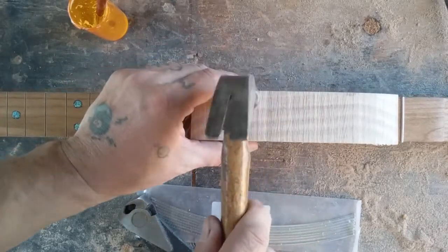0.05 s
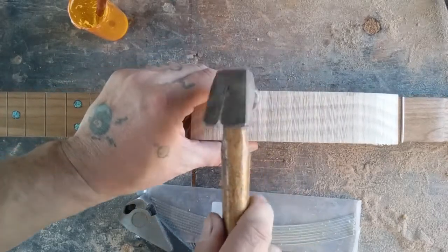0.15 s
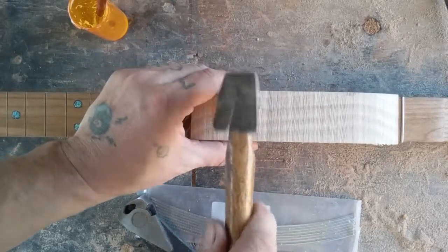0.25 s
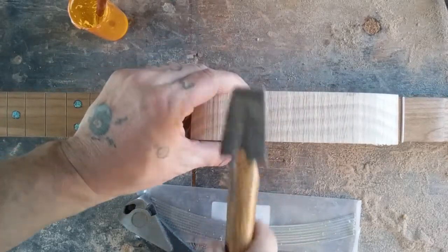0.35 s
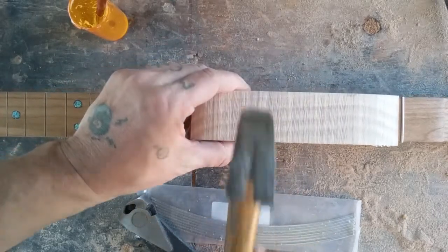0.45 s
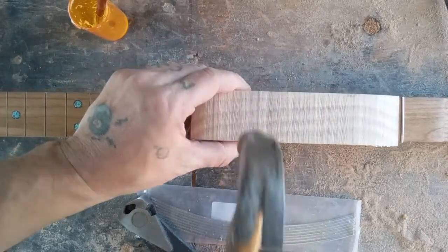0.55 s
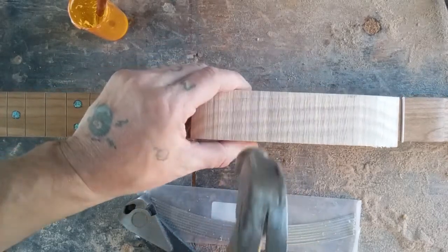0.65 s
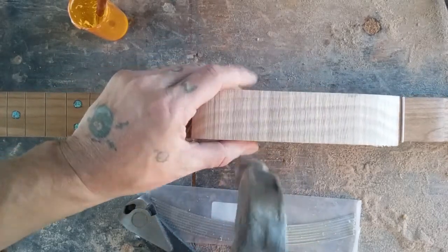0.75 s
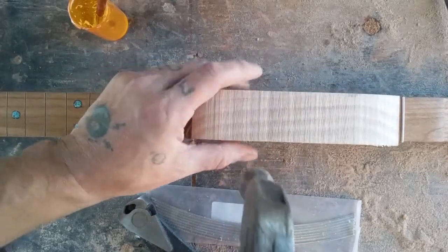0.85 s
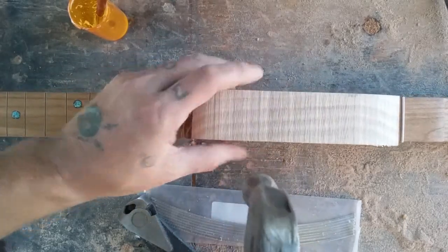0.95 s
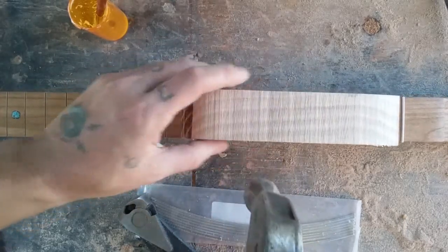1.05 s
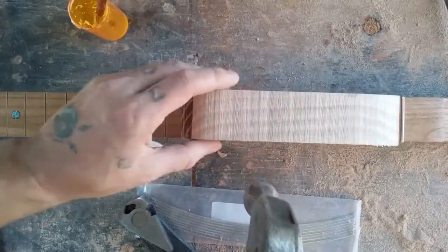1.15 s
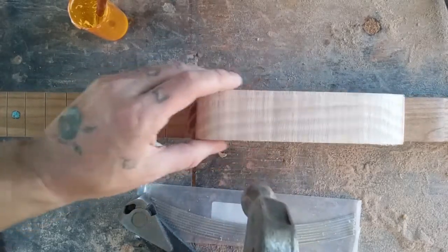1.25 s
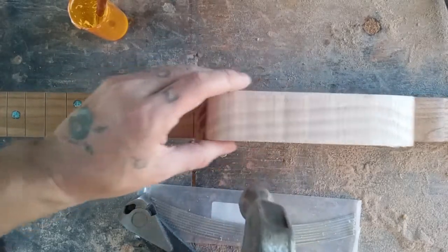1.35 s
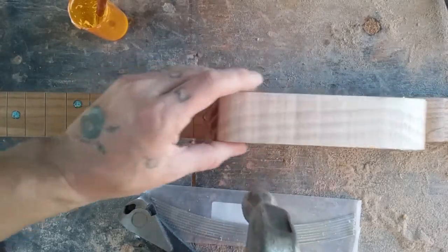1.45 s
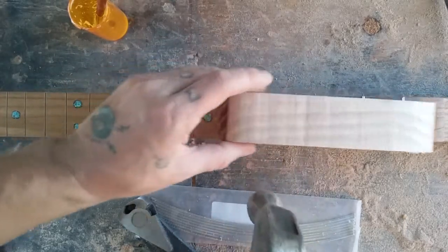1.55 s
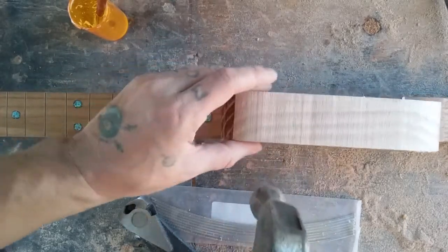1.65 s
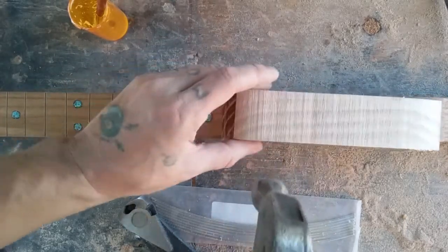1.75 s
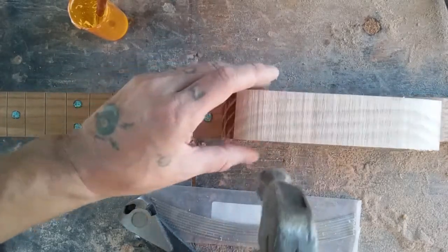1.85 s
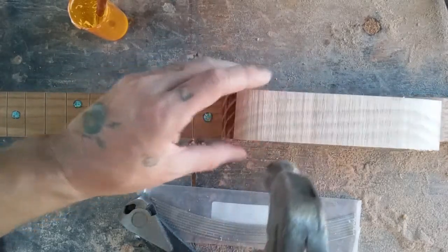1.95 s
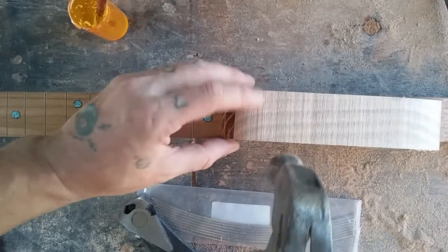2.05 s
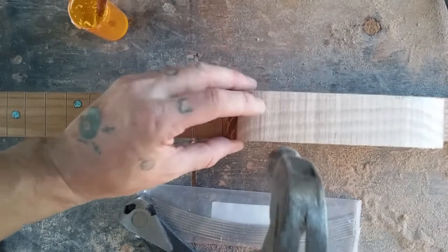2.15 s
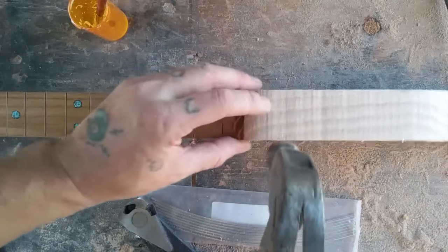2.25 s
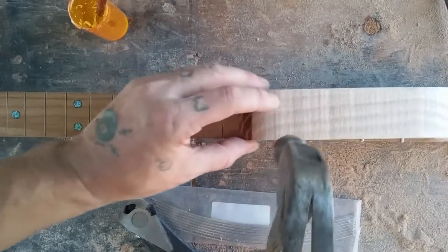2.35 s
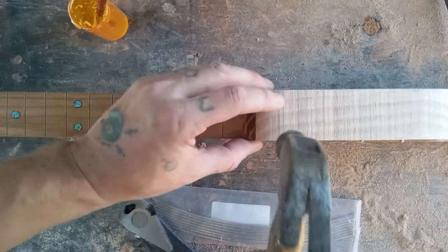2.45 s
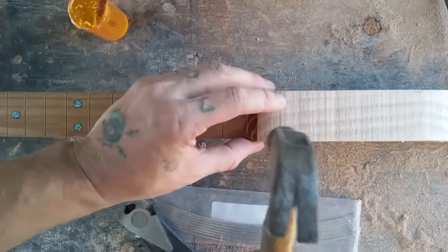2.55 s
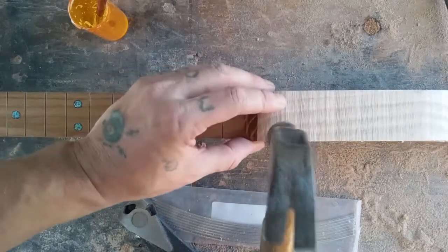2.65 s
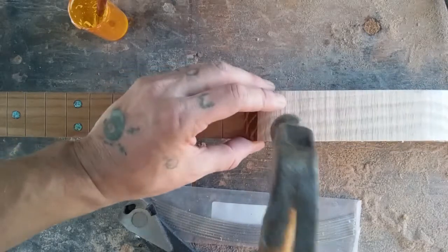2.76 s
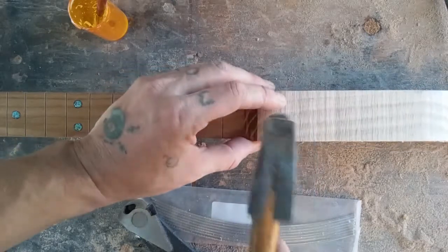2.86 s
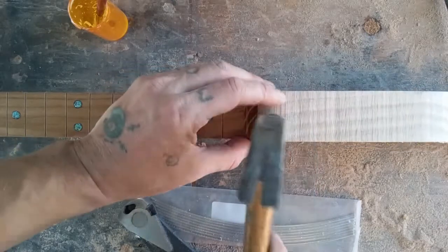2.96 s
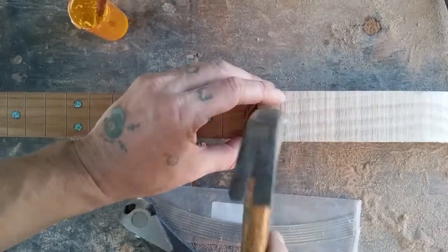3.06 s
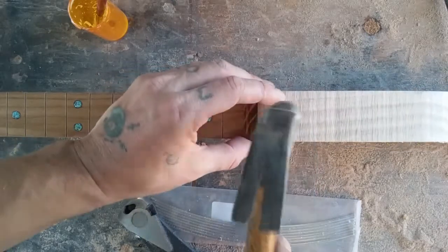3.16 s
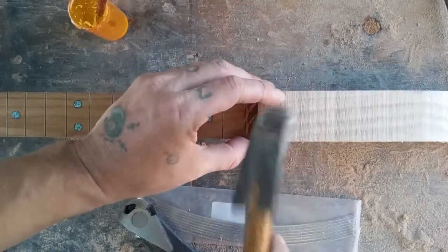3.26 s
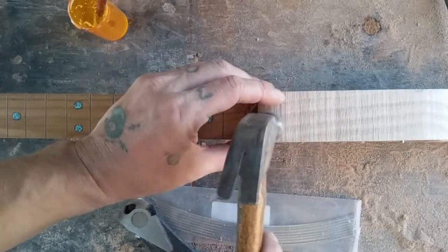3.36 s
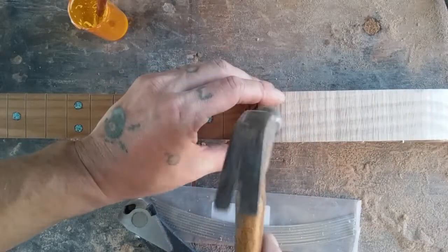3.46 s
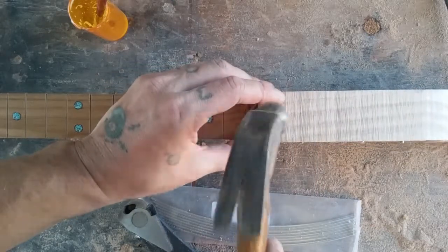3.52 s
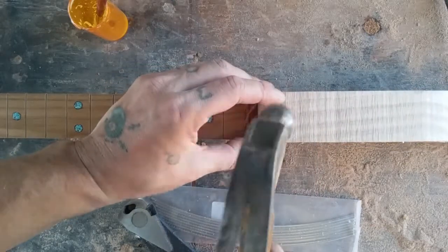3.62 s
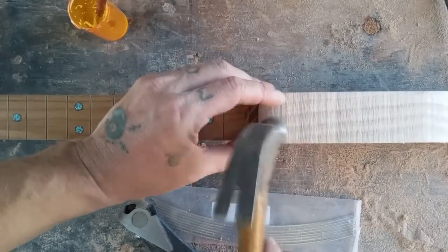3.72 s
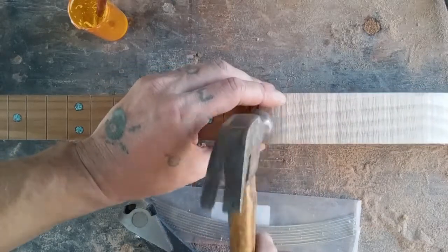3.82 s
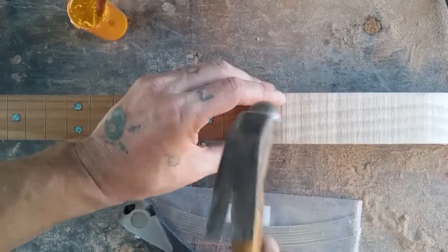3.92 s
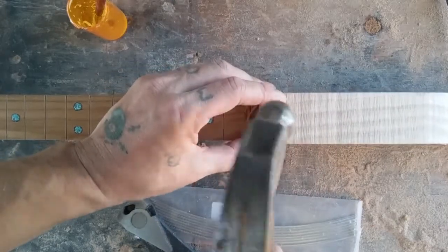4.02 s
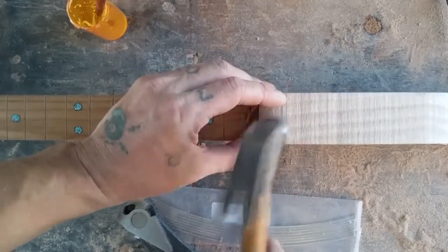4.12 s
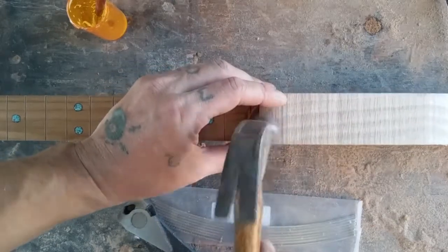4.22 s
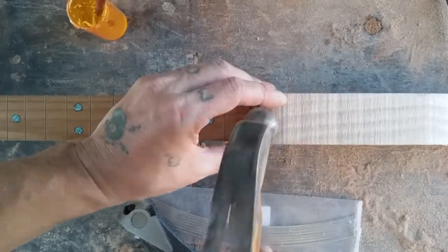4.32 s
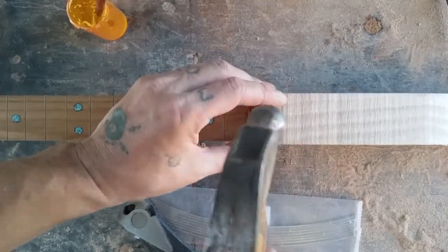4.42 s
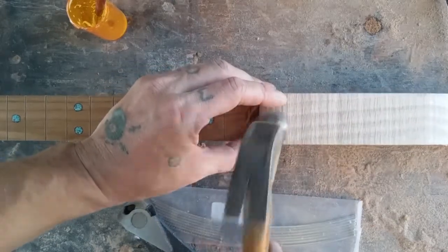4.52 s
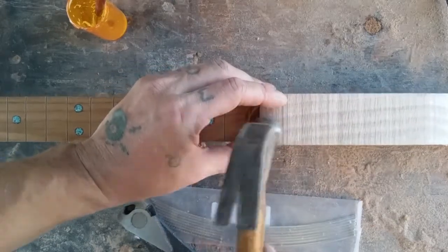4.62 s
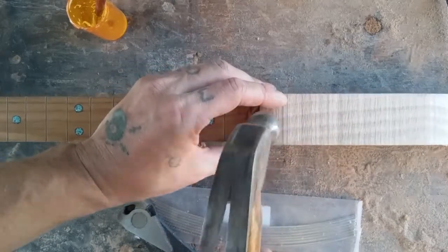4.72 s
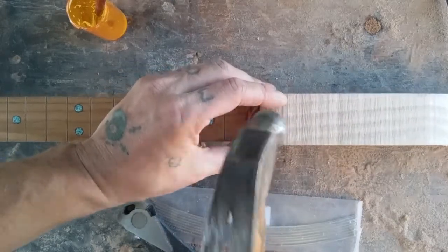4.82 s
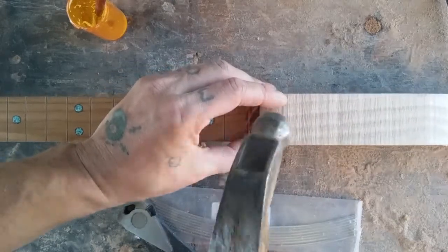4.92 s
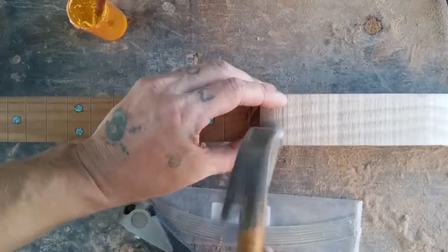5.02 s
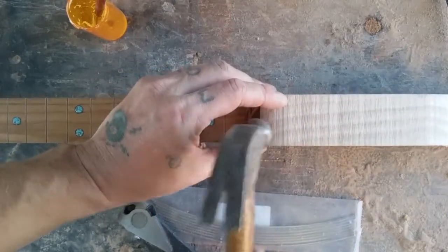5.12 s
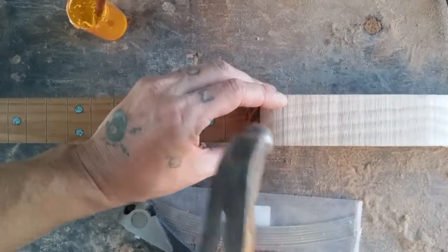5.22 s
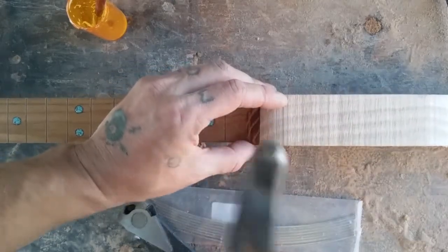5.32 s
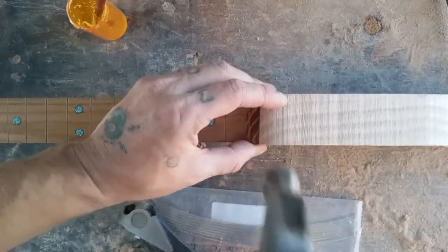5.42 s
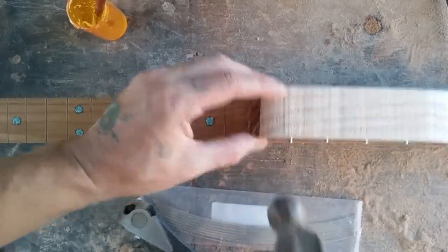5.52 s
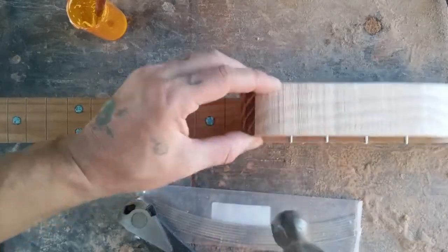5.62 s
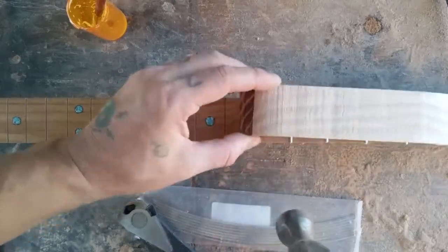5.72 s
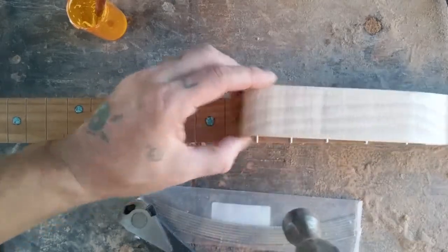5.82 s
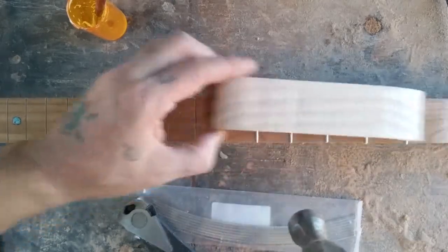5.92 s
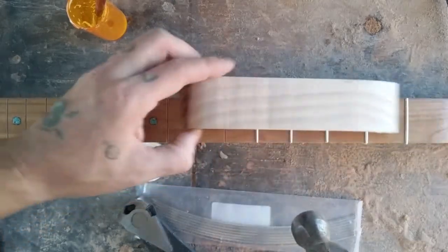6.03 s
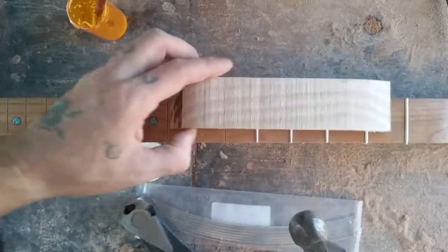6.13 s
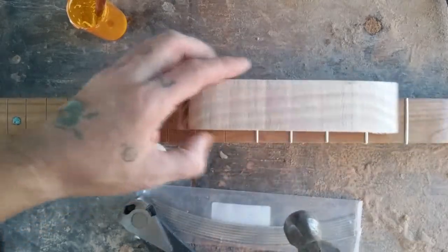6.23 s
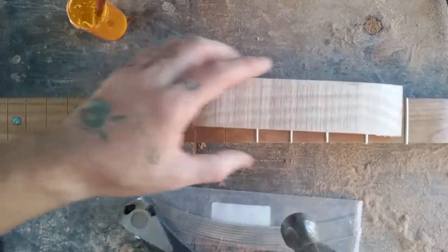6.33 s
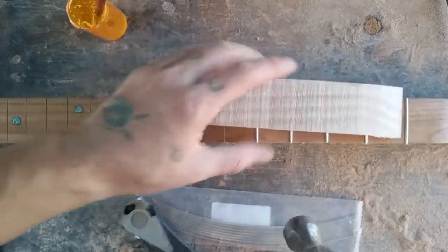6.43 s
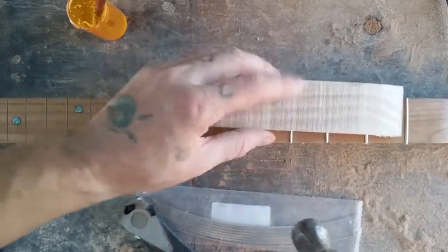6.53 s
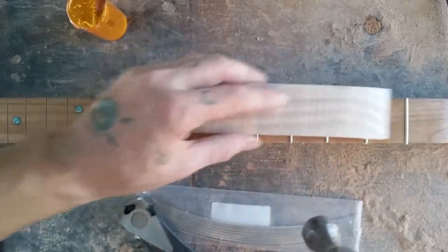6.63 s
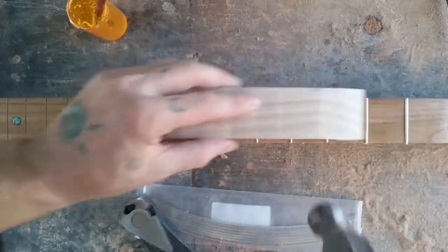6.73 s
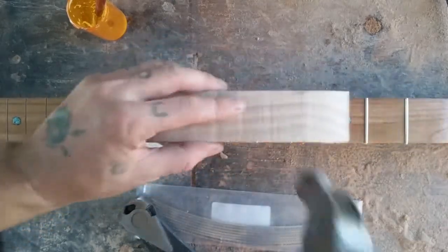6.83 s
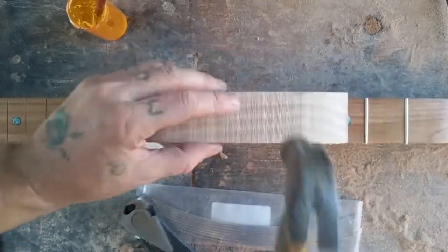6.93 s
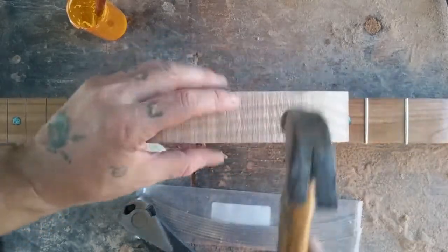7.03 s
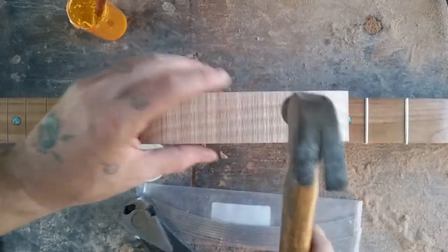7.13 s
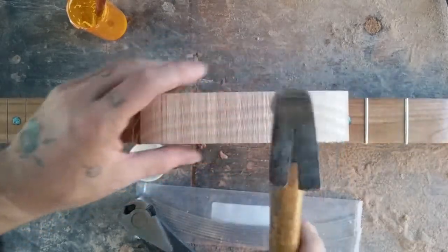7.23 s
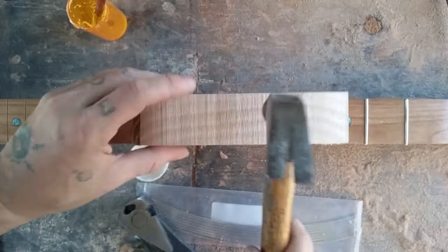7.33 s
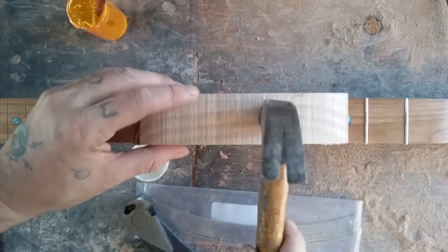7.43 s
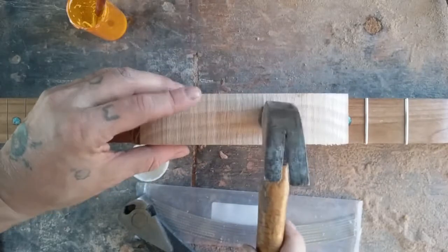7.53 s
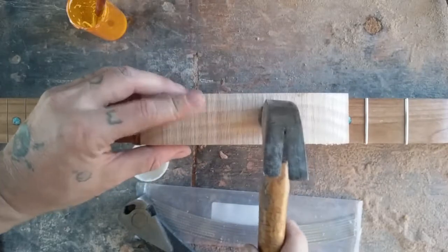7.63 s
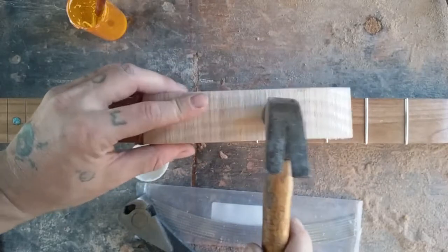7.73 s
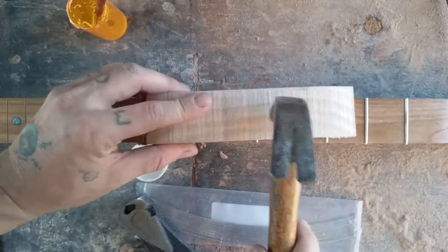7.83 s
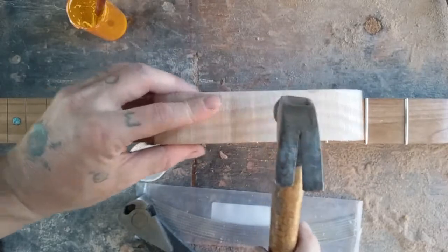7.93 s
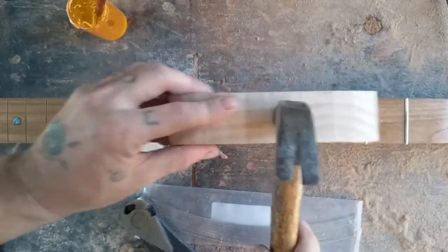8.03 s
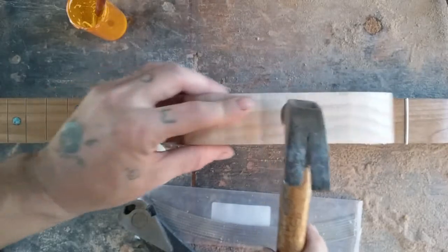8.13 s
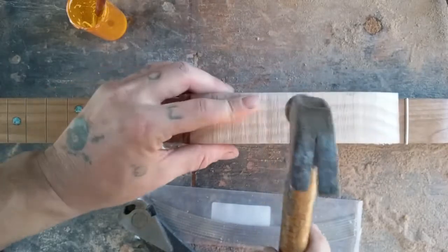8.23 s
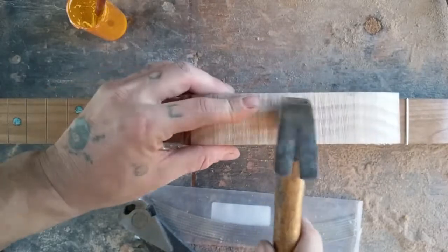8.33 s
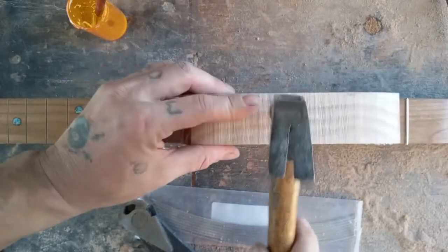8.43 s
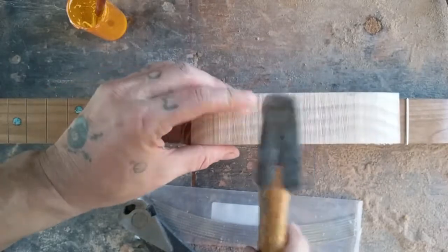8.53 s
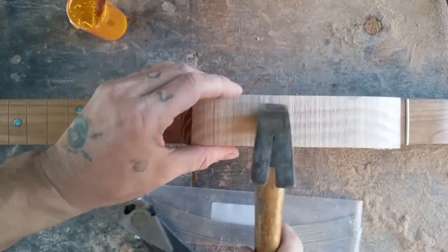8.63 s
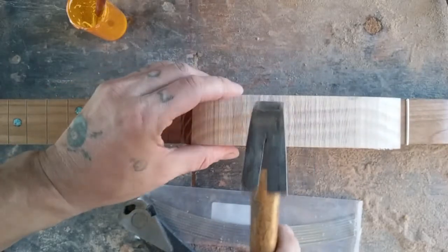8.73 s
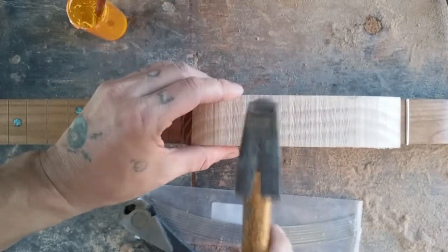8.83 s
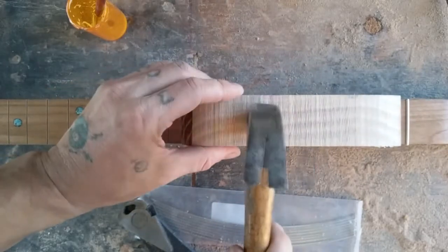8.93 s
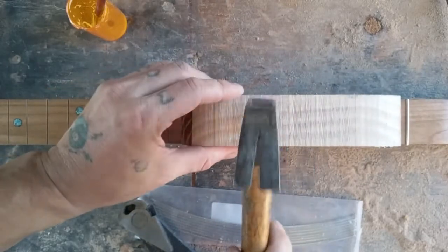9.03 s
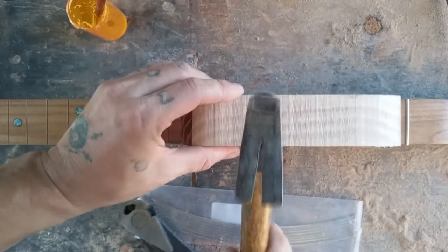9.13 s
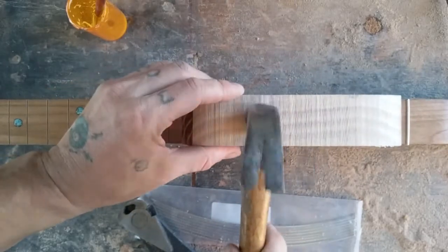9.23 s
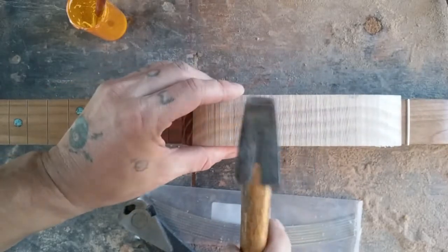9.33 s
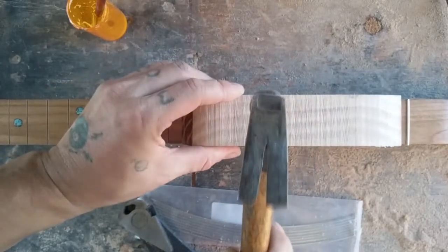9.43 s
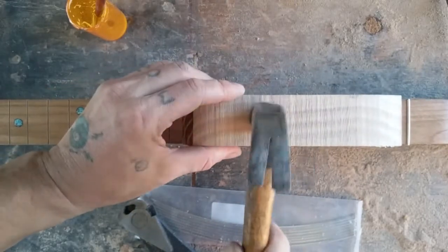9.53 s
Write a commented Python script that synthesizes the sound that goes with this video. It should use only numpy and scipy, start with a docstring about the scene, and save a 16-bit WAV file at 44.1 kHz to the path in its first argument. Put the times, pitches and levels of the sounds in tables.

```python
"""A steel hammer blow drives a wooden block that presses wire into a long board on a workbench; both rattle.
A hand then drags the block over the wire and sets it down: grains of friction and soft knocks ring the wood.
A run of blows and rebounds follows, with the steel ringing thinly, then more dragging and a last run
broken by a short drag. Throughout, a faint room tail answers and the close phone microphone hisses;
its gate opens with the sound, its limiter holds the peaks."""
import sys
import numpy as np
from scipy import signal
from scipy.fft import rfft, irfft, next_fast_len
from scipy.io import wavfile
from scipy.ndimage import uniform_filter1d, minimum_filter1d, map_coordinates

SR = 44100
rng = np.random.default_rng(int(sys.argv[2]) if len(sys.argv) > 2 else 0)


def unload_audio(sound):
    """Save the sound as a 16-bit wav file, at the path given as the first command line argument."""
    columns = np.transpose(np.atleast_2d(sound))
    # keep every value between -1 and 1, then stretch to whole-number steps
    steps = np.round(np.clip(columns, -1, 1) * 32767)
    wavfile.write(sys.argv[1], SR, steps.astype(np.int16))


N = 422037
SOUND_SAMPLES = 16384  # length of one knock or ring

# Hammer blows and rebounds: (time [s], strength [dB], hardness [dB], block ring [dB], rattle T60 [s])
BLOWS = [(0.1317, -8, 8.5, 1.5, 0.1), (0.1517, -21.5, 7, -1.5, .16), (3.0258, -13, 0.5, -1.5, .13),
         (3.0916, -19.5, -6.5, -3.5, 0.07), (3.3966, -5.5, 7, -10, .1), (3.4264, -9, -5, -1.5, 0.063),
         (3.4487, -15, 9.5, -3, 0.1), (3.8134, -6, 8, -4, 0.087), (3.8412, -12.5, 0, -2.5, .16),
         (3.8663, -18, 12.5, -7.5, .12), (4.24, -7, 8, -6, .14), (4.2739, -12, 2, -1, .047),
         (4.3051, -18, 1.5, -2, .042), (4.6656, -7, 8, -4, .12), (4.6945, -15, 2.5, 2.5, 0.093),
         (5.1173, -6.5, 5.5, -4.5, .13), (5.1476, -15.5, -1.5, -7.5, .12), (7.434, -34.5, -17, -4.5, .04),
         (7.4857, -11.5, -3, -0.5, .1), (7.5435, -19.5, -19, -10.5, 0.036), (8.093, -12, 4, 6, 0.096),
         (8.3856, -6, 1.5, -5.5, .15), (8.6629, -6, 1.5, 0.5, .1), (8.6979, -10, -13.5, -3.5, .041),
         (8.958, -6, 10.5, -0.5, .12), (8.9882, -13, -3.5, -8.5, .09), (9.2741, -8, 12.5, 3.5, .1),
         (9.3, -9.5, -5.5, -8.5, 0.047)]
# Part levels of a blow; rows: face, bench, board, block, hollow, click
# (offset over strength [dB], per strength [dB/dB], per hardness [dB/dB], per block ring [dB/dB])
BLOW_MIX = [(-1.5, 0, 1, 0.24), (-5, 0.01, .1, -.2), (0, 0, 0, 0), (0.5, 0, 0, 1), (-5.5, 0.03, .2, 0.59),
            (-22.5, -0.32, 2.5, 0.38)]
REBOUND_S, REBOUND_DB = .1, -18  # a contact this soon after another is a rebound: this much less click

# Free rings of the head off the wood: (time [s], level [dB], tilt [dB/octave], extra claw mode [dB])
STEEL_RINGS = [(.168, -33.5, 2, -2), (3.435, -39, 6.5, 13), (3.91, -47.5, -1.5, 11), (4.3, -54, -21.5, 12),
               (4.704, -30, -1, 1), (5.158, -36, 3.5, 0.5), (7.493, -48.5, 6.5, 4), (8.112, -43.5, 0, 5.5),
               (8.411, -47, 9.5, 3), (8.682, -46, 5.5, 7), (9.011, -47, 7, -0.5), (9.31, -43, 9.5, -8)]
# Modes of the hammer head: (frequency [Hz], level [dB], T60 [s])
STEEL_MODES = [(2323, -7, .19), (2982, -14, .14), (3268, -14, .3), (3677, -14, .12), (4240, -5, .21),
               (4850, -19, .2), (5206, -14, .2), (5432, -14, .15), (5795, -6, .14), (6420, -3, .1),
               (7960, -3, .1), (8220, -15, .12), (8930, -2, .085), (9617, -14, .1), (10385, -7, .085),
               (11900, -10, .07), (13570, -12, .08), (15300, -10, .07)]
CLAW_HZ = 4240  # the claw's mode; the tilt turns about it
BUZZ_DB, BUZZ_HZ, BUZZ_T60_S = -1, 500, 0.091  # random flutter at the start of a ring

# Block bumps a wire or is set down: (time [s], strength [dB], hardness [dB], block ring [dB])
BUMPS = [(0.2786, -45, -19, -4), (0.5155, -36.5, -25, -7), (0.6094, -55, -21, -21),
         (0.7772, -39, -24, -15.5), (.79, -39, -32.5, -30), (1.3271, -26.5, -27, -25),
         (1.4722, -38.5, -5, 6), (1.5085, -34.5, -26, 8.5), (1.5651, -23, -16.5, -17),
         (2.2565, -54, -19.5, -20), (2.3006, -35.5, -29, -19), (2.4153, -27, -32.5, -7.5),
         (2.4703, -30.5, -30, -1), (5.5466, -35.5, -29, -18), (5.5727, -31, -38, -13.5),
         (5.6457, -43, -12.5, -17), (5.7466, -45, -20, -20), (5.849, -34, -32, -23.5),
         (6.0071, -29.5, -9, -11), (6.0273, -22.5, -17.5, -15), (6.0653, -17, -14.5, -8),
         (6.1261, -24.5, -23, -30.5), (6.2451, -21.5, -13, -7), (6.257, -20.5, -8, -12),
         (6.5912, -33, -28, -14), (6.658, -32, -27, -23.5), (6.7127, -18.5, -5.5, -12),
         (6.7528, -16.5, -11, -11), (6.793, -26, -11, 0), (6.9992, -49, -17.5, -31),
         (7.0391, -36.5, -28, -41), (7.0814, -56, -9.5, -13.5), (7.1582, -40.5, -24.5, -39),
         (7.29, -55, -11, -17), (7.951, -47.5, -19, -19), (7.9969, -35, -7, -6.5),
         (8.0069, -22, -22.5, -21), (8.0385, -20, -16.5, -19.5), (8.076, -16.5, -13.5, -9.5),
         (8.2735, -33, -28, -22)]
# Part levels of a bump; rows and columns as BLOW_MIX
# (offset over strength [dB], per strength [dB/dB], per hardness [dB/dB], per block ring [dB/dB])
BUMP_MIX = [(-0.5, -0.18, 1, 0.011), (-16.5, -0.41, 0.08, 0.099), (1.5, 0.15, 0.02, 0), (0.5, 0.12, 0, 1),
            (-6.5, 0.014, 0.96, .3), (-30, 0.9, 0.98, 0.01)]
BUMP_RATTLE_T60_S = .042

# Drag envelopes, one list per stroke: (time [s], board level [dB], brightness [dB])
DRAGS = [
    [(1.31, -65.5, -21), (1.332, -32.5, -12), (1.35, -33, -24), (1.49, -28.5, -16), (1.556, -27.5, -9),
     (1.57, -22, -20.5), (1.59, -34, -10.5), (1.626, -31.5, -15), (1.796, -44.5, -26.5), (1.86, -87.5, 0)],
    [(2.24, -45, -25.5), (2.268, -35.5, -37), (2.282, -52, -21), (2.304, -28.5, -24), (2.318, -38, -21),
     (2.382, -37, -18), (2.408, -31.5, -25), (2.418, -33.5, -11.5), (2.52, -30, -27), (2.58, -78, -9.5)],
    [(5.54, -66, -13), (5.55, -42.5, -25), (5.57, -50, -24), (5.578, -40, -16), (5.59, -40.5, -30),
     (5.624, -60.5, -14), (5.652, -45, -16.5), (5.696, -65, -8), (5.758, -42, -20), (5.82, -83, -24)],
    [(5.84, -60.5, -12), (5.852, -41.5, -22.5), (5.992, -51.5, -3), (6.008, -34.5, -2.5),
     (6.038, -27, -4.5), (6.056, -34.5, -7.5), (6.072, -21.5, -13), (6.11, -44, -8), (6.128, -26, -15),
     (6.22, -70, -26)],
    [(6.23, -45.5, -15), (6.246, -27, -10), (6.264, -26.5, -5), (6.278, -32.5, -4), (6.324, -26, -27),
     (6.34, -26.5, -19), (6.366, -30.5, -32.5), (6.452, -74.5, -11), (6.474, -56.5, -22), (6.5, -69, -13)],
    [(6.55, -63, -23), (6.6, -36, -24.5), (6.63, -61, -11.5), (6.674, -29, -18.5), (6.754, -22.5, -6),
     (6.762, -13.5, -17), (6.894, -28, -18), (6.942, -37, -29), (6.972, -63.5, -12), (7.0, -68, -11)],
    [(7.92, -64.5, -16), (7.954, -43, -26.5), (7.99, -41.5, -17), (7.996, -37.5, -10.5),
     (8.014, -28.5, -12.5), (8.022, -33, -2), (8.03, -32.5, -13.5), (8.054, -27, -5.5), (8.085, -27.5, -6)],
    [(8.125, -12.5, -10.5), (8.133, -25.5, -14.5), (8.193, -28.5, -6.5), (8.221, -29, -17),
     (8.231, -36, -12.5), (8.265, -38, -19), (8.277, -34.5, -17), (8.287, -32, -30.5), (8.341, -68, -11),
     (8.36, -61, -16)],
]
# Per stroke: (wire squeak [dB], weight on the bench [dB])
STROKES = [(-7, 3), (-14, -0.5), (5, -6), (4.5, -2), (-1, 2.5), (1.5, 3), (-7, 0.5), (-2, 3.5)]
# Part levels of rubbing; rows: board, bench, block, hollow, squeak, scratch
# (offset over board [dB], per board level [dB/dB], per brightness [dB/dB])
DRAG_MIX = [(0, 0, 0), (-17, -0.22, 0.028), (-3, 0.2, 0.71), (-8.5, 0.1, 0.9), (-27, -0.43, 1.1),
            (-6.5, 0.43, 0.85)]
CATCH_HZ, CATCH_DB = 90, 2  # rate of random points, level swing per standard deviation
SLIPS_PER_S, SLIP_S, SLIP_DB = 150, .003, -3  # sudden slips of the sliding block

# Resonances of bench, board, block and the face struck: (centre [Hz], width [Hz], level [dB])
BENCH = [(62, 20, -10), (80, 13, -6), (97, 12, -2), (130, 18, 0), (177, 18, 0), (215, 30, -8)]
BOARD = [(269, 20, -13), (336.3, 29, -4), (414, 75, -12), (513.1, 40, -9), (629, 180, -17), (797, 75, -13)]
BLOCK = [(1009, 88, 0), (1262, 220, 2), (1525, 320, -6)]
FACE = [(2426, 300, -6), (2860, 530, -2), (3254, 310, -1), (3340, 400, -3.5), (4056, 210, 1.5),
        (4350, 120, -4.5), (4315, 550, -5.5)]
# Contact click, hollow under the block, wire squeak, scratch: (centre [Hz], width [Hz], level [dB])
CLICK = [(6030, 300, -0.5), (8380, 1100, -3), (11700, 1600, -2.5), (13230, 1600, -4), (14264, 1700, -7)]
HOLLOW = [(1740, 210, -3), (1884, 160, -2.5), (2172, 140, -8)]
SQUEAK = [(2635, 57, -9.5), (2886, 230, -8.5), (6480, 52, -17)]
SCRATCH = [(2640, 820, 2.5), (3700, 830, 2), (4700, 270, -6), (5870, 840, -17)]
WOOD_TOP_HZ = 8600  # wood passes little above this
BRIDGE_START_S, BRIDGE_END_S, BRIDGE_DB = 7.2, 8.14, 7.5  # block bridges unseated wires: louder hollow
MOVED_S, MOVED_DB = 7.2, -4  # from here the block lies further along the board: knocks stir the bench less

# Decay of the room tail: (frequency [Hz], T60 [s])
SHOP_DECAY = [(80, 0.88), (400, 0.19), (2000, 0.13), (10000, 0.054)]
# Hiss spectrum before levelling: (frequency [Hz], relative density [dB/Hz])
HISS_SPECTRUM = [(15, -44.5), (33, -20.5), (60, -9), (114, -11), (266, -14.5), (400, -12.5), (2600, -25.5),
                 (3910, -29.5), (8000, -27), (14000, -22.5), (16500, -30.5)]
HISS_DB = -62.5  # RMS ahead of the microphone chain
# Left-right difference: (frequency [Hz], level of the added quadrature signal [dB])
WIDTH = [(60, -42), (350, -55.5), (1400, -36), (3000, -28.5), (11000, -34.5)]
TOP_HZ = 16200


def hammer():
    """Blow forces ring wood and hollow; the head, sprung free, rings in its own modes."""
    return hammer_on_wood() + steel_ring()


def hammer_on_wood():
    """Hard, brief contacts excite the block, board and bench; rebounds click less."""
    hit_s, *controls_db, rattle_t60_s = np.transpose(BLOWS)
    parts_db = mixed(BLOW_MIX, *controls_db)
    rebound = np.diff(hit_s) < REBOUND_S
    parts_db[-1, 1:] += REBOUND_DB * rebound
    return knocks(hit_s, parts_db, rattle_t60_s, FACE, rattle_db=[-25.5, -10.5, -7.0, -18.5, -13.0, -33.5],
                  contact_s=0.00033, crack_s=0.00066, click_s=.0008)


def steel_ring():
    """Decaying sine modes of the free head; the ring starts rough, then settles."""
    ring_s, ring_db, tilt_db, claw_db = np.transpose(STEEL_RINGS)
    hz, mode_db, t60_s = np.transpose(STEEL_MODES)[:, :, None]
    t = np.arange(SOUND_SAMPLES) / SR
    onset = 1 - np.exp(-t / .002)
    modes = amp(mode_db - 60 * t / t60_s) * np.sin(2 * np.pi * hz * t) * onset
    scatter_db = 3 * rng.standard_normal((len(ring_s), len(hz)))
    colour_db = ring_db + tilt_db * np.log2(hz / CLAW_HZ) + claw_db * (hz == CLAW_HZ)
    strength = amp(scatter_db + colour_db.T)
    noise = rng.standard_normal((len(ring_s), SOUND_SAMPLES))
    flutter = unit(filtered(noise, lambda f: 1 / (1 + 1j * f / BUZZ_HZ)))
    roughness = 1 + amp(BUZZ_DB - 60 * t / BUZZ_T60_S) * flutter
    return placed(ring_s, strength @ modes * roughness)


def knocks(s, parts_db, rattle_t60_s, face, rattle_db, contact_s, crack_s, click_s):
    """Each contact is a short rough push, then loose parts chatter; every part of the wood rings with it."""
    t = np.arange(SOUND_SAMPLES) / SR
    parts_db[4] += bridged_db(s)
    parts_db[1] += MOVED_DB * (s > MOVED_S)
    noise = rng.standard_normal((len(s), SOUND_SAMPLES))
    push = (1 + 0.93 * noise) * np.exp(-t / contact_s)

    def crush(rise_s):
        """Fibres and grit give way as the faces meet."""
        return noise * t / rise_s * np.exp(-t / rise_s)

    softness = amp(-.25 * (parts_db[0] - parts_db[0].max()))[:, None]  # a weaker contact lasts longer
    crack = crush(crack_s * np.minimum(softness, 2.5))
    spikes = noise * amp(7.97 * rng.standard_normal(noise.shape))
    t60_s = np.clip(rattle_t60_s, .005, .4)[..., None]
    chatter = spikes * amp(-60 * (t / t60_s) ** 1.136)  # dies ever faster
    parts = [face, BENCH, BOARD, BLOCK, HOLLOW, CLICK]
    forces = [crack, push, push, push, push, crush(click_s)]
    sound = 0
    for part, force, part_db, loose_db in zip(parts, forces, parts_db, rattle_db):
        ring = rung(force + amp(loose_db) * chatter, part, scatter_db=2)
        if part is not CLICK:
            ring = filtered(ring, lambda hz: 1 / (1 + 1j * hz / WOOD_TOP_HZ) ** 2)
        peak = np.abs(ring).max(axis=1, keepdims=True)
        sound = sound + amp(part_db)[:, None] * ring / peak
    return placed(s, sound)


def bumps():
    """Soft wood-on-wire contacts excite the same wood, with scratch in place of the struck face."""
    s, *controls_db = np.transpose(BUMPS)
    return knocks(s, mixed(BUMP_MIX, *controls_db), BUMP_RATTLE_T60_S, SCRATCH,
                  rattle_db=[-15, -5.5, -17.5, -7.5, -9, -6.5],
                  contact_s=0.00009, crack_s=0.0008, click_s=.001)


def drag():
    """Uneven grains of friction shake the wood and the wire while the block slides."""
    t = np.arange(N) / SR
    parts = [BOARD, BENCH, BLOCK, HOLLOW, SQUEAK, SCRATCH]
    sharpness = [1.2, 1.3, 3, 3, 1.4, 0.062]
    grains = friction()
    ringing = []
    for part, again in zip(parts, sharpness):
        # steady rubbing feeds the strongest resonances most
        fed_back = again * unit(rung(grains, part))
        ringing.append(unit(rung(grains + fed_back, part)))
    catch = map_coordinates(rng.standard_normal(N * CATCH_HZ // SR + 4), [t * CATCH_HZ])  # catches and slips
    return amp(CATCH_DB * catch) * np.sum(drag_levels(t) * np.array(ringing), axis=0)


def friction():
    """Spiky noise grains swell at random slips, each swell decaying exponentially."""
    grains = rng.standard_normal(N) * amp(5.6 * rng.standard_normal(N))
    slips = (rng.random(N) < SLIPS_PER_S / SR) * rng.exponential(size=N)
    swell = filtered(slips, lambda hz: SR * SLIP_S / (1 + 2j * np.pi * hz * SLIP_S))
    return grains * (1 + amp(SLIP_DB) * np.abs(swell))


def drag_levels(t):
    """Gain of each part over time; the holding hand stops the ringing with the stroke."""
    levels = np.zeros((len(DRAG_MIX), N))
    for stroke, (squeak_db, bench_db) in zip(DRAGS, STROKES):
        s, *controls_db = np.transpose(stroke)
        parts_db = mixed(DRAG_MIX, *controls_db)
        parts_db[1] += bench_db
        parts_db[3] += bridged_db(s)
        parts_db[4] += squeak_db
        fade = np.clip(np.minimum(t - s[0], s[-1] - t) / 0.0065 + .5, 0, 1)
        levels += fade * amp([np.interp(t, s, db) for db in parts_db])
    return levels


def shop(x):
    """Room tail of noise in which each frequency dies at its own speed."""
    hz, t, z = signal.stft(rng.standard_normal(SR // 2), SR, nperseg=256)
    decay = amp(-60 * t / along(SHOP_DECAY, hz)[:, None])
    tail = signal.istft(z * decay, SR, nperseg=256)[1]
    delayed = np.pad(x, (300, 0))  # samples
    return signal.fftconvolve(delayed, tail / np.linalg.norm(tail))[:N]


def microphone_hiss():
    """Steady noise shaped to the hiss spectrum."""
    noise = rng.standard_normal(N)
    return amp(HISS_DB) * unit(filtered(noise, lambda hz: amp(along(HISS_SPECTRUM, hz))))


def mixed(mix, level_db, *colours_db):
    """Level of every part from one level and its colour controls."""
    return level_db + np.array(mix) @ [np.ones_like(level_db), level_db, *colours_db]


def bridged_db(s):
    """Extra level of the hollow at each time."""
    return BRIDGE_DB * ((s > BRIDGE_START_S) & (s < BRIDGE_END_S))


def rung(force, modes, scatter_db=0):
    """Force through parallel resonances of alternating sign; each row strikes them at scattered strengths."""
    spot = amp(scatter_db * rng.standard_normal((len(modes), *force.shape[:-1], 1)))

    def response(f):
        """Sum of band-pass resonances."""
        total = 0
        for k, (centre, width, db) in enumerate(modes):
            resonance = 1j * f * width / (centre * centre - f * f + 1j * f * width)
            total = total + (-1) ** k * amp(db) * spot[k] * resonance
        return total

    return filtered(force, response)


def placed(times_s, sounds):
    """Short sounds laid out at their times."""
    out = np.zeros(N + SOUND_SAMPLES)
    for s, sound in zip(times_s, sounds):
        out[round(s * SR):][:SOUND_SAMPLES] += sound
    return out[:N]


def filtered(x, response):
    """x times a complex response of frequency."""
    n = x.shape[-1]
    m = next_fast_len(n + SOUND_SAMPLES)
    return irfft(rfft(x, m) * response(np.fft.rfftfreq(m, 1 / SR)), m)[..., :n]


def along(points, hz):
    """Interpolates (frequency [Hz], value) points on a log axis."""
    f, v = np.transpose(points)
    return np.interp(np.log(hz + 1), np.log(f + 1), v)


def amp(db):
    """dB to amplitude."""
    return 10 ** (np.asarray(db) / 20)


def unit(x):
    """Scales to unit RMS."""
    return x / np.sqrt(np.mean(x ** 2) + 1e-20)


def scene():
    """Sums hammer, handling, room and hiss; the channels differ by a slight phase."""
    blows = hammer()
    handling = bumps() + drag()
    room = amp(-21) * shop(blows + amp(-11.5) * handling)
    heard = blows + handling + room
    side = filtered(heard, lambda hz: 1j * amp(along(WIDTH, hz)))
    return heard + microphone_hiss() + np.array([side, -side])


def record(dry):
    """The capsule loses deep bass, a gate turns quiet moments down, a limiter holds peaks, the band ends."""
    dry = filtered(dry, lambda hz: (1j * hz / (1j * hz + 45)) ** 2)
    upper = filtered(dry, lambda hz: 1 / (1 + (220 / (hz + 1)) ** 4))  # the gate neither hears nor cuts the bass
    span = int(0.025 * SR)
    power = uniform_filter1d(upper[0] ** 2, span, origin=span // 3)  # left channel, mostly the past
    level_db = 10 * np.log10(np.abs(power) + 1e-12)
    gate_db = np.clip(0.81 * (level_db + 50.5), -11, 0)
    gate = amp(uniform_filter1d(gate_db, int(0.012 * SR)))
    opened = dry - upper * (1 - gate)
    hold = int(.002 * SR)
    need = np.minimum(1, .9 / (np.abs(opened).max(axis=0) + 1e-9))
    held = opened * uniform_filter1d(minimum_filter1d(need, hold), hold // 2)
    return filtered(held, lambda hz: hz < TOP_HZ)


dry = scene()
out = record(dry)
unload_audio(out)
```